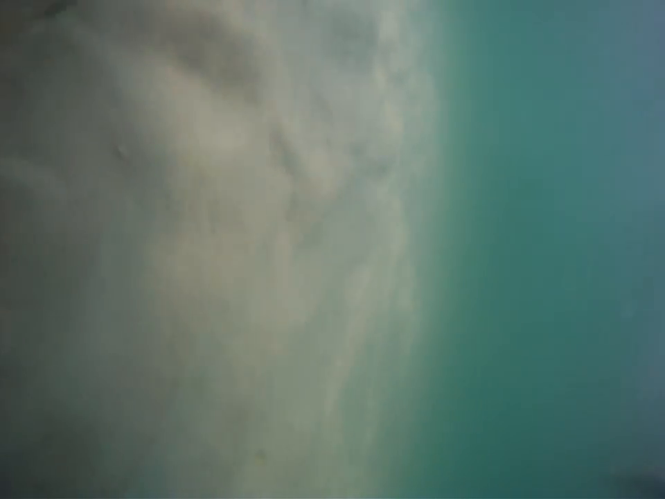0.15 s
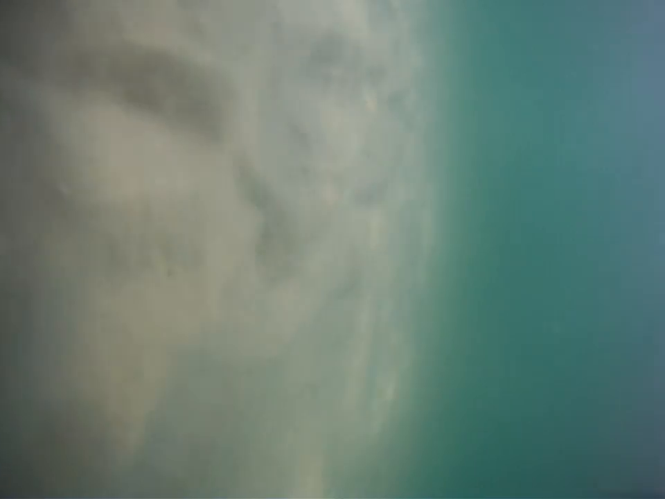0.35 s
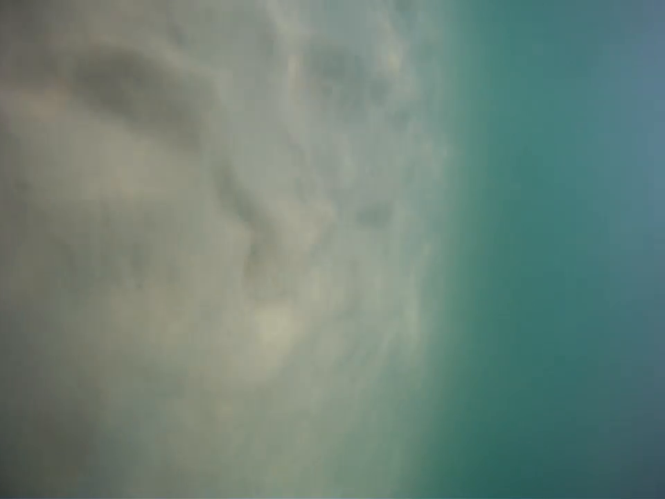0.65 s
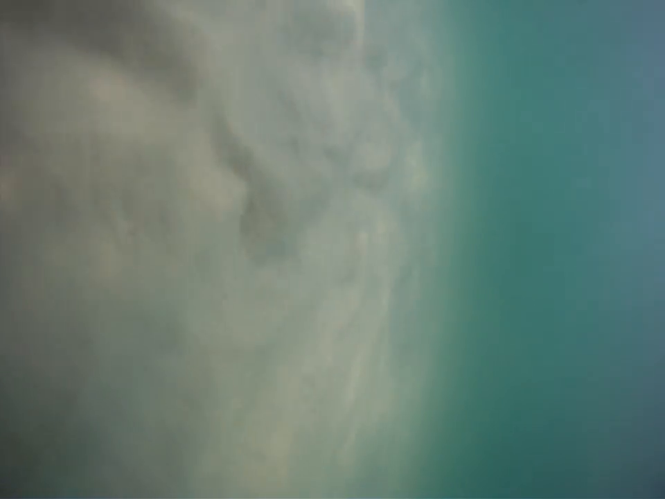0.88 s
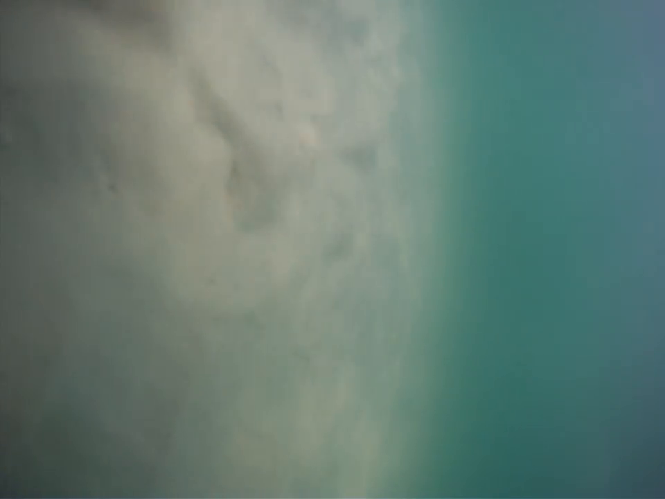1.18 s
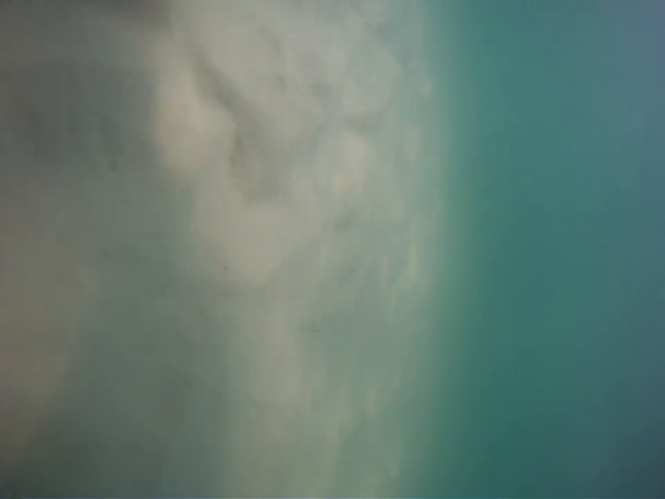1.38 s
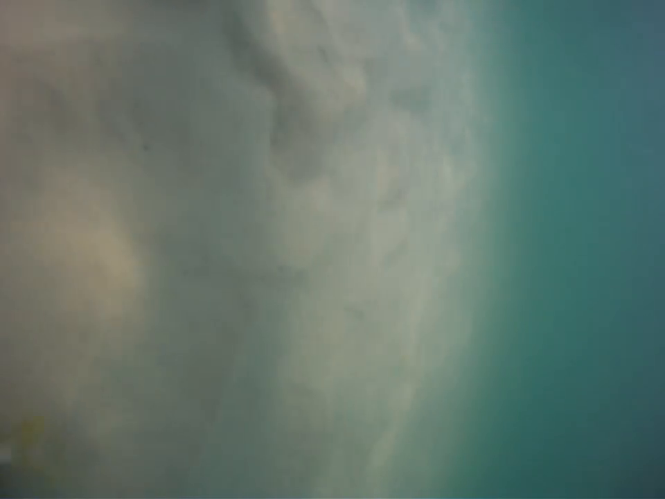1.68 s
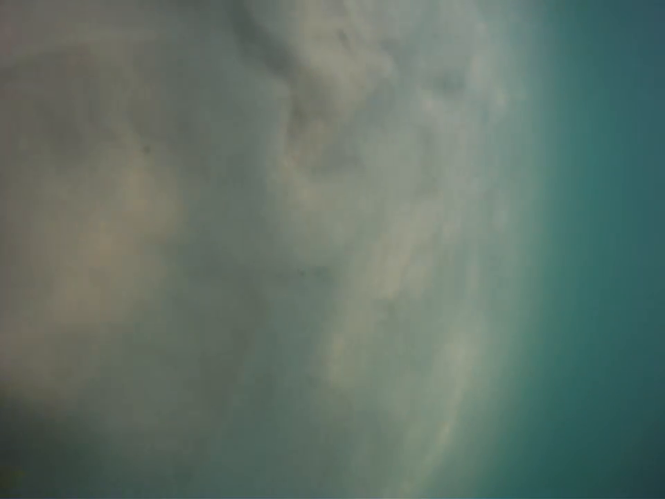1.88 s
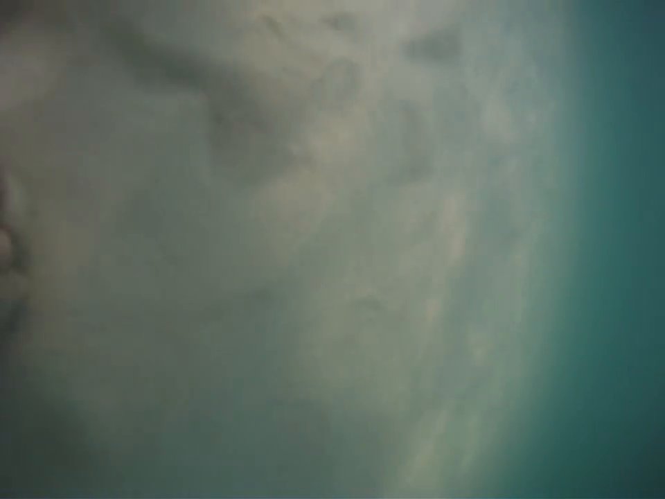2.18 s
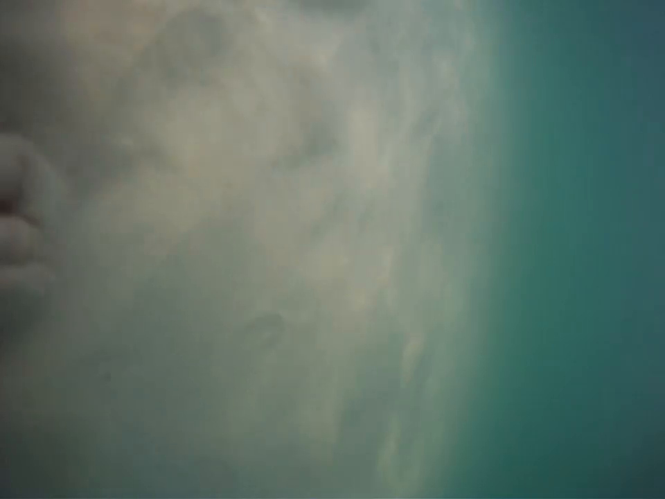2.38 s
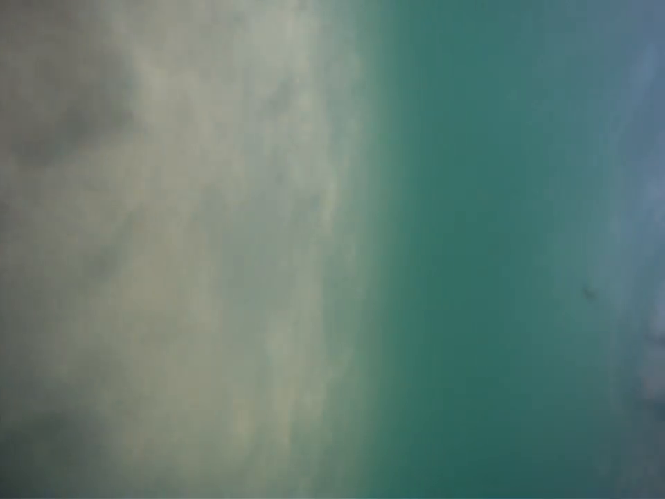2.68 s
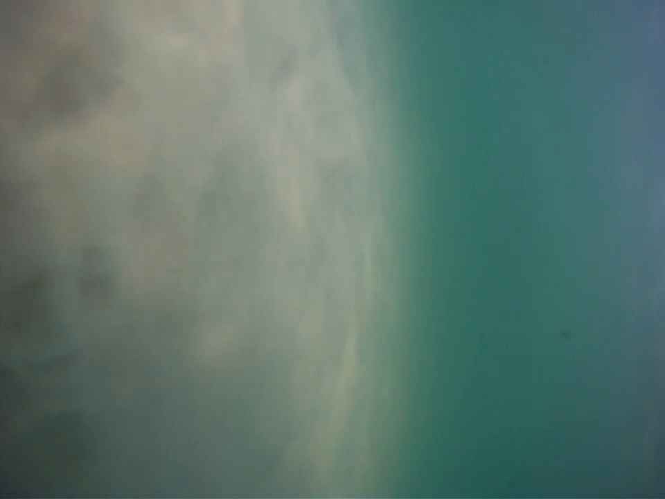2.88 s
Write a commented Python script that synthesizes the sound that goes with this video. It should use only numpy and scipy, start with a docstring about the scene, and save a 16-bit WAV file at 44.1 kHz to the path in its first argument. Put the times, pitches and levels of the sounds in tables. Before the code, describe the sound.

Underwater in the sea, a camera in its housing picks up deep uneven rumbling, dull bubble gurgles and soft hiss, until a handling knock booms loudly just before the close. Dull, boxy, close sound.

```python
"""Water shoves the sealed housing of a small camera under the sea and rings its deep cavity as narrow-band noise.
Large bubbles gurgle as pulse trains, fine ones fizz as patchy noise, and distant water adds a steady wash.
Single bubbles ping as dying tones over a thin whine; the shell creaks and cracks in bursts of slips,
and blows ring the housing's modes, three of them far the strongest. The camera samples at a low rate
and holds each sample, so the sound is mirrored faintly into the treble."""
import sys
import numpy as np
from scipy import signal
from scipy.fft import rfft, irfft
from scipy.io import wavfile
from scipy.ndimage import uniform_filter1d

SR = 44100
rng = np.random.default_rng(int(sys.argv[2]) if len(sys.argv) > 2 else 0)


def natural_amplitude(level_db):
    """Convert a level in decibels to a linear amplitude factor, elementwise."""
    exponent = np.asarray(level_db, float) / 20
    return 10 ** exponent


def wav_out(sig):
    """Save sig, one row per channel (or a flat mono array), as 16-bit PCM at SR to the path in sys.argv[1]."""
    wavfile.write(sys.argv[1], SR, np.round(np.clip(np.atleast_2d(sig).T, -1, 1) * 32767).astype(np.int16))


N = 134505  # length in samples


def evened(x):
    """Normalization to unit root-mean-square amplitude."""
    return x / np.sqrt(np.mean(x ** 2) + 1e-20)


def level(points, column=1):
    """Linear interpolation in time of one column of a table whose first column is seconds."""
    rows = np.transpose(points)
    return np.interp(np.arange(N) / SR, rows[0], rows[column])


def colour(x, points, tilt_db=0):
    """Linear filtering: multiplies the spectrum by a gain curve plus a tilt in dB per octave about 1 kHz."""
    hz = np.fft.rfftfreq(len(x), 1 / SR) + 1
    point_hz, point_db = np.transpose(points)
    gain_db = np.interp(np.log(hz), np.log(point_hz), point_db, left=-60, right=-80)
    gain_db = gain_db + tilt_db * np.log2(np.maximum(hz, 80) / 1000)
    return irfft(rfft(x) * natural_amplitude(gain_db), len(x))


def clicks(per_s, spread_db, size):
    """Random impulse train: sparse events of either sign with exponentially spread levels, a few large."""
    sign = rng.choice([-1., 1.], size)
    strength = natural_amplitude(spread_db * np.minimum(rng.exponential(1, size), 4))
    happens = rng.random(size) < per_s / SR
    return sign * strength * happens


def patchy(patch_db, frames_wide, bins_wide):
    """Modulated noise: a random spectrum whose level drifts in patches over time and pitch."""
    real, imaginary, patches = rng.standard_normal((N // 128 + 5, 257, 3)).T
    patches = uniform_filter1d(patches, round(bins_wide), 0)
    patches = evened(uniform_filter1d(patches, round(frames_wide), 1))
    spectrum = (real + 1j * imaginary) * natural_amplitude(patch_db * patches)
    return evened(signal.istft(spectrum, nperseg=512, noverlap=384)[1][:N])


def add(mix, s, sound):
    """Superposition: adds a sound into the mix from second s, in place."""
    part = mix[round(s * SR):][:len(sound)]
    part += sound[:len(part)]


def shove():
    """Cavity resonance: random pushes excite two equal resonators in series."""
    # strength of the water's shoves: start_s, level_db
    shove_levels = [(0, -45), (.09, -51), (.13, -39.5), (.19, -51), (.24, -44.5), (.32, -53), (.47, -62),
                    (.535, -39), (.6, -52.5), (1.02, -45.5), (1.22, -52.5), (1.33, -46), (1.5, -50),
                    (1.75, -44.5), (1.85, -54), (2.0, -43.5), (2.15, -46.5), (2.2, -54), (2.3, -39.5),
                    (2.39, -56), (2.45, -36), (2.53, -56), (3.05, -52.5)]
    cavity_hz, width_hz = 34.25, 15.1
    radius = np.exp(-np.pi * width_hz / SR)
    poles = [1, -2 * radius * np.cos(2 * np.pi * cavity_hz / SR), radius * radius]
    x = rng.standard_normal(N + SR)
    for _ in range(2):
        x = signal.lfilter([1, -1], poles, x)
    x = x[SR:]  # drops the build-up of the resonance
    # dividing by the running rms leaves the slow swells to the table
    steadied = x / (np.sqrt(uniform_filter1d(x ** 2, 2500)) + 0.1 * np.std(x))
    return evened(steadied) * natural_amplitude(level(shove_levels))


def gurgle():
    """Bubble oscillation: short pulses of 16 sizes glide upward as they die, and splash noise joins them."""
    # large bubbles: start_s, level_db, tilt_db_per_octave (toward small bubbles, about 250 Hz)
    gurgle_curve = [(0, -53, -1), (.3, -56, -2), (.5, -59, -4), (.575, -43, -2.5), (.8, -48, 0),
                    (1.23, -53, 3), (1.35, -49.5, 4.5), (1.64, -52, -1.5), (1.71, -43, 0.5),
                    (1.8, -59.5, -5.5), (2.3, -55, -0.5), (3.05, -62.5, -1.5)]
    # muffling by the housing: pitch_hz, gain_db
    muffle = [(40, -26), (70, 2), (430, -4.5), (530, -13.5), (1300, -9), (2000, -26.5)]
    pulses_per_s, low_hz, high_hz = 1100, 76.8, 438.5
    turns, splash_db = 3.11, 3.5  # cycles per unit of pulse time; splash over pulses before muffling
    pulses, tilt_db = np.zeros(N), level(gurgle_curve, column=2)
    for hz in np.geomspace(low_hz, high_hz, 16):
        t = np.arange(int(3 * turns / hz * SR)) / SR
        u = t * hz / turns
        tone = np.sin(2 * np.pi * hz * t * (1 + 0.095 * u))
        grain = u * np.exp(-3 * u) * tone * hz / 250
        train = signal.oaconvolve(clicks(pulses_per_s / 16, 2.3, N), grain)[:N]
        pulses += train * natural_amplitude(tilt_db * np.log2(hz / 250))
    splashing = evened(pulses) + natural_amplitude(splash_db) * patchy(1.0, 10, 8)
    return evened(colour(splashing, muffle)) * natural_amplitude(level(gurgle_curve))


def fizz():
    """Incoherent sum of tiny bubbles: a patchy hiss with small ticks, filtered by the shell."""
    # fine bubbles: start_s, level_db
    fizz_levels = [(0, -52), (.12, -51), (.2, -58.5), (.8, -60), (1.45, -66), (1.8, -61.5), (2.0, -66.5),
                   (2.35, -64.5), (2.6, -70.5), (2.9, -64), (2.96, -63.5)]
    # fizz through the shell: pitch_hz, gain_db
    fizz_colour = [(500, -53), (1150, -12.5), (1600, -3.5), (1850, 3), (2030, -1), (2300, -3.5), (2800, -9),
                   (4200, -23), (5500, -22)]
    lift_s, lift_ratio = 2.94, 1.25  # from this moment the fizz rings higher
    ticks_per_s, ticks_db = 1500, -8.5  # ticks relative to the hiss
    n = np.arange(90)
    tick = rng.standard_normal(90) * np.exp(-n / 25.0)
    ticks = signal.oaconvolve(clicks(ticks_per_s, 2.3, N), tick)[:N]
    x = patchy(1.43, 14, 6) + natural_amplitude(ticks_db) * evened(ticks)
    low = colour(x, fizz_colour)
    high = colour(x, [(hz * lift_ratio, db) for hz, db in fizz_colour])
    return evened(np.where(np.arange(N) / SR < lift_s, low, high)) * natural_amplitude(level(fizz_levels))


def wash():
    """Broadband noise of distant water, at a steady mean level."""
    # spectrum of the wash: pitch_hz, gain_db
    wash_colour = [(60, -27.5), (150, -8), (400, -11), (700, -11), (1200, -17.5), (2500, -19.5),
                   (4500, -22), (6200, -29.5)]
    wash_db = -61
    return natural_amplitude(wash_db) * evened(colour(patchy(1.04, 20, 5), wash_colour))


def bubbles():
    """Damped oscillation: each bubble, or tick of the shell, rings one exponentially dying, rising tone."""
    # single pings: start_s, level_db (before the onset ramp), pitch_hz (at the start), t60_s
    pings = [(0.124, -30.5, 550, 0.021), (.166, -49, 2900, 0.026), (.4983, -45.5, 2390, 0.025),
             (1.169, -37, 620, 0.011), (1.2715, -48.5, 4370, 0.02), (1.808, -42.5, 630, 0.0099),
             (2.647, -42, 2110, 0.009), (2.276, -48.5, 844, 0.034), (2.281, -46.5, 1410, .03),
             (2.339, -47, 1560, .02), (2.362, -39, 1740, 0.027), (2.735, -31.5, 2120, 0.0059),
             (2.7779, -22, 2120, 0.0047), (2.807, -37, 2370, 0.0081), (2.4612, -39.5, 3193, 0.024),
             (2.935, -48, 724, 0.026)]
    rise_s, glide = 0.00076, 0.0095  # glide: added share of the phase at t60
    out = np.zeros(N)
    for s, db, hz, t60 in pings:
        t = np.arange(0, t60, 1 / SR)
        envelope = natural_amplitude(db - 60 * t / t60) * np.minimum(t / rise_s, 1)
        add(out, s, envelope * np.sin(2 * np.pi * hz * t * (1 + glide * t / t60)))
    return out


def whine():
    """Pure tone: a thin sinusoid of fixed pitch and varying level."""
    # the whine: start_s, level_db (rms)
    whine_levels = [(.15, -72), (.35, -66), (.8, -72), (1.7, -84)]
    pitch_hz = 1353
    t = np.arange(N) / SR
    return np.sqrt(2) * natural_amplitude(level(whine_levels)) * np.sin(2 * np.pi * pitch_hz * t)


def cracks():
    """Stick-slip: bursts of tiny slips, each with two larger snaps, filtered by the shell."""
    # creaks and cracks: start_s, length_s (to the fade below), level_db (before the envelope),
    # rise_s, tilt_db_per_octave (negative is duller)
    crack_list = [(1.842, 0.12, -48.5, 0.0048, -2), (2.267, 0.023, -53.5, 0.001, 0),
                  (2.4593, 0.014, -39.5, 0.00043, -0.5), (2.499, 0.011, -56, 0.0022, -4),
                  (2.51, 0.0081, -51, 0.0026, -6), (2.727, 0.11, -47.5, 0.009, -0.5),
                  (2.751, 0.039, -36, 0.026, -5.5), (2.8977, 0.011, -40, 0.0002, 1)]
    # the shell's crack colour: pitch_hz, gain_db
    shell = [(80, 1), (200, 4), (500, 0.5), (1000, -3.5), (1500, -7.5), (2200, -1.5), (2900, -10),
             (3550, -8), (3900, -14), (5500, -18), (6200, -22)]
    fade_db, slips_per_s = -16, 2000
    snap, second_snap_s = 2.5, 0.0045  # size of both snaps; delay of the second
    slips = clicks(slips_per_s, 1.2, N) + 0.57 * rng.standard_normal(N)
    for row in crack_list:
        for lag in (0, second_snap_s):
            slips[round((row[0] + lag) * SR) + 20] = -snap
    out = np.zeros(N)
    for s, length, db, rise, tilt_db in crack_list:
        t = np.arange(0, 2 * length, 1 / SR)
        burst = colour(slips, shell, tilt_db)[round(s * SR):][:len(t)]
        t = t[:len(burst)]
        envelope = np.minimum(t / rise, 1) * natural_amplitude(db + fade_db * (t / length) ** 2)
        add(out, s, evened(burst) * envelope)
    return out


def thump():
    """Modal vibration: each blow excites the housing's modes, which ring until the hand damps them."""
    # blows: start_s, deep_db (lowest mode), push (+1) or pull (-1), overtones_db, damped_to_half_s
    blows = [(2.671, -41, -1, -48, 2.71), (2.7244, -38, 1, -17, 2.775), (2.736, -18.5, -1, -52, 2.775),
             (2.7645, -15, 1, -46, 2.84), (2.855, -35.5, 1, -43, 2.9)]
    # housing modes: pitch_hz, gain_db (added to the blow's), t60_s
    modes = [(29.5, 4, 0.38), (82, -1.5, 0.12), (209, -31, 0.053)]
    damp_s, onset_s = 0.026, 0.0051  # damping lasts twice damp_s
    out = np.zeros(N)
    for s, deep_db, way, over_db, until in blows:
        t = np.arange(0, until - s + damp_s, 1 / SR)
        ring = np.zeros(len(t))
        for k, (hz, gain_db, t60) in enumerate(modes):
            blow_db = over_db if k else deep_db
            ring += natural_amplitude(gain_db + blow_db - 60 * t / t60) * np.sin(2 * np.pi * hz * t)
        damp = np.sin(np.pi / 2 * np.clip((t[-1] - t) / (2 * damp_s), 0, 1)) ** 2
        onset = np.sin(np.pi / 2 * np.minimum(t / onset_s, 1)) ** 2
        add(out, s, np.sign(way) * ring * damp * onset)
    return out


def scene():
    """Superposition of all sources at the one microphone."""
    water = shove() + gurgle() + fizz() + wash()
    return (water + bubbles() + whine() + cracks() + thump())[None]


def roll_off(x):
    """The treble ends steeply here."""
    return signal.sosfilt(signal.butter(12, 16220, fs=SR, output="sos"), x)


def record(dry):
    """Zero-order hold: 12000 samples a second, each held for four steps, mirror the sound upward."""
    slow = signal.resample_poly(dry, 40, 147, axis=1)
    held = np.repeat(slow, 4, axis=1)  # 48000 steps a second
    held = signal.resample_poly(held, 147, 160, axis=1)  # back to SR
    low_pass = signal.firwin(255, 15400, window=("kaiser", 4), fs=SR)
    mix = signal.oaconvolve(held, low_pass[None])[:, 127:N + 127]  # without the filter's delay
    return roll_off(mix)


dry = scene()
out = record(dry)
wav_out(out)
```